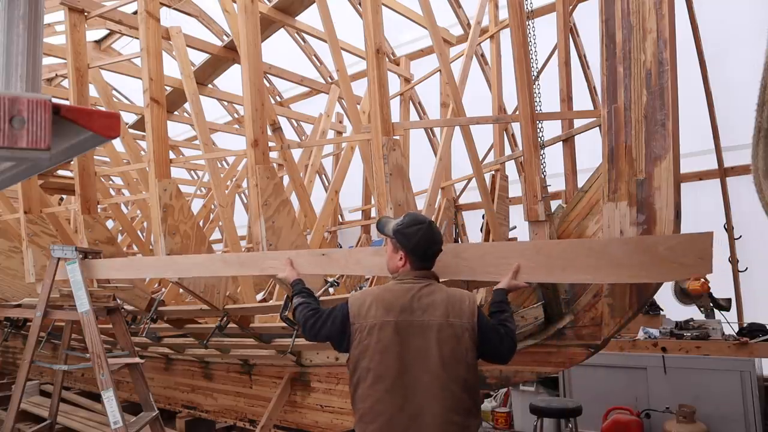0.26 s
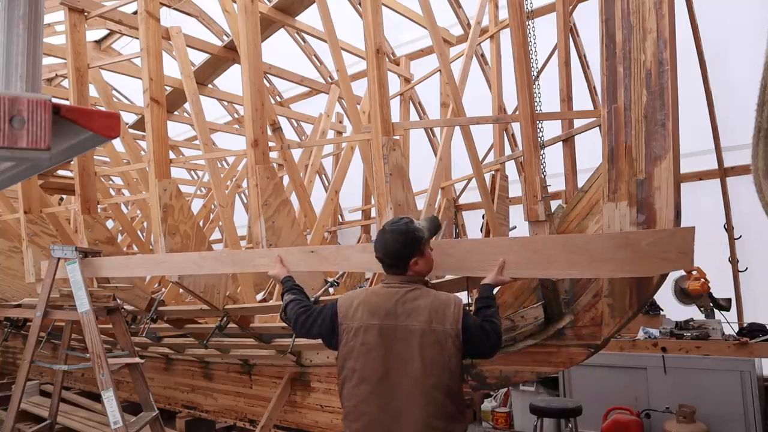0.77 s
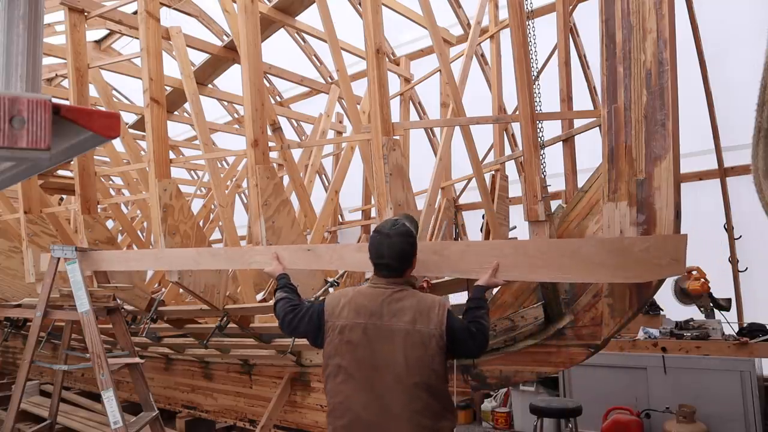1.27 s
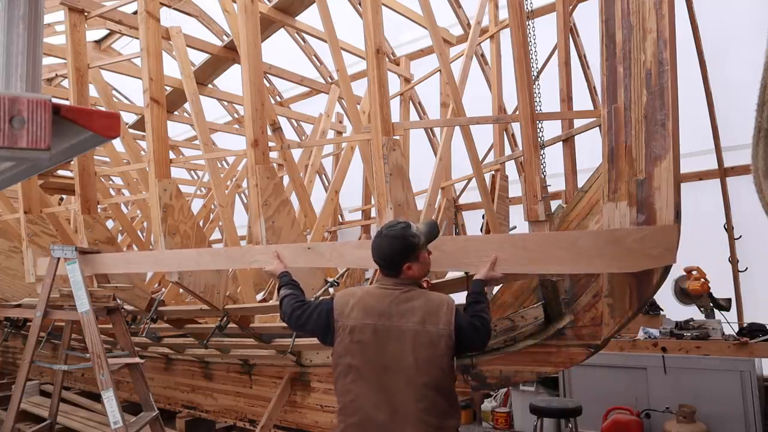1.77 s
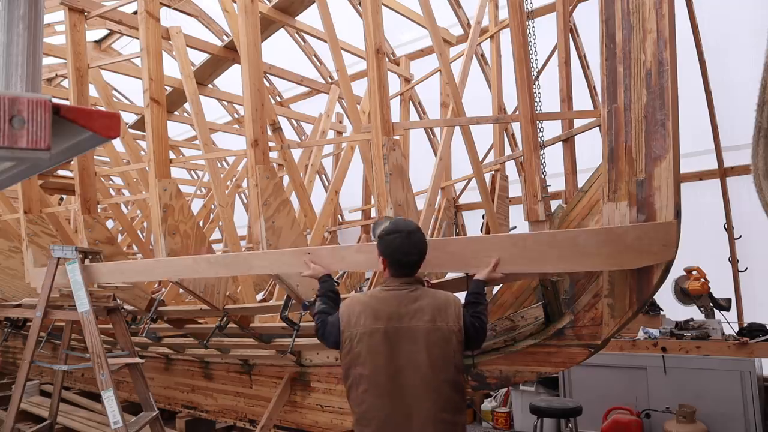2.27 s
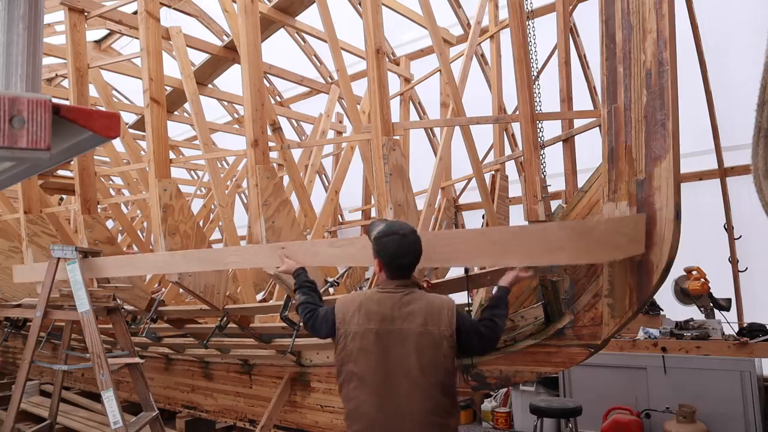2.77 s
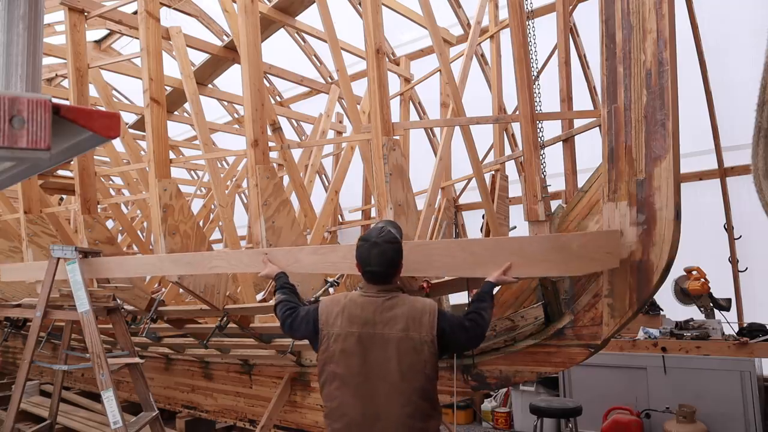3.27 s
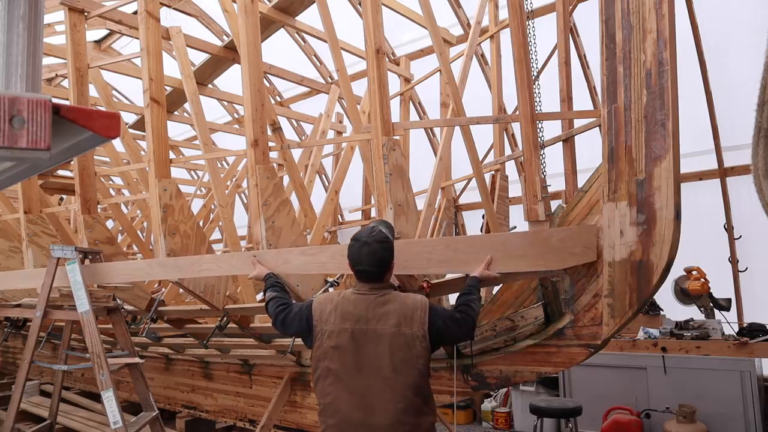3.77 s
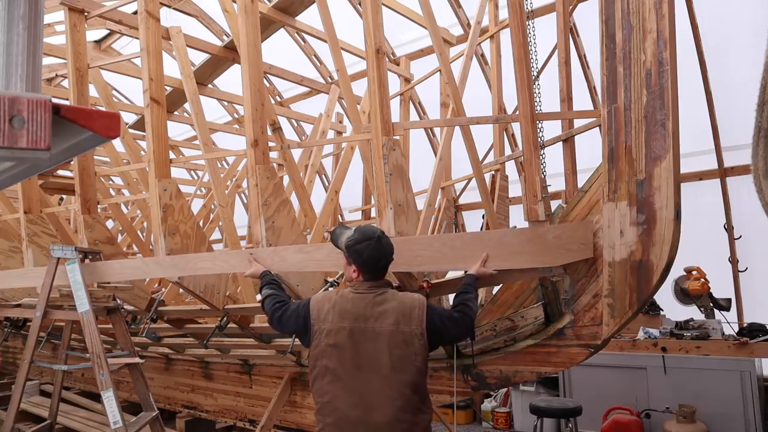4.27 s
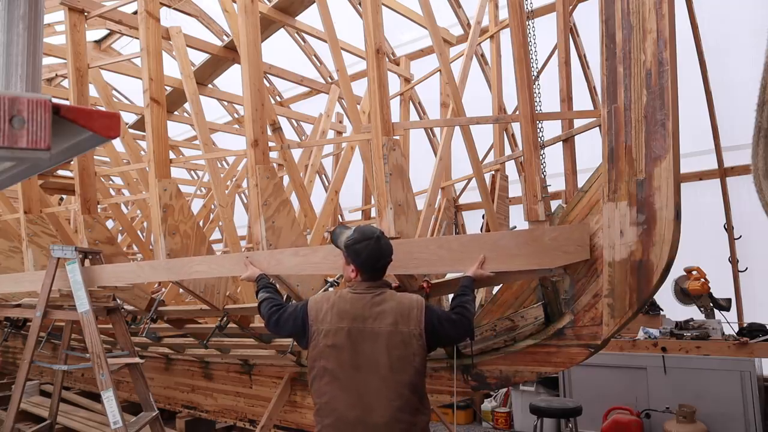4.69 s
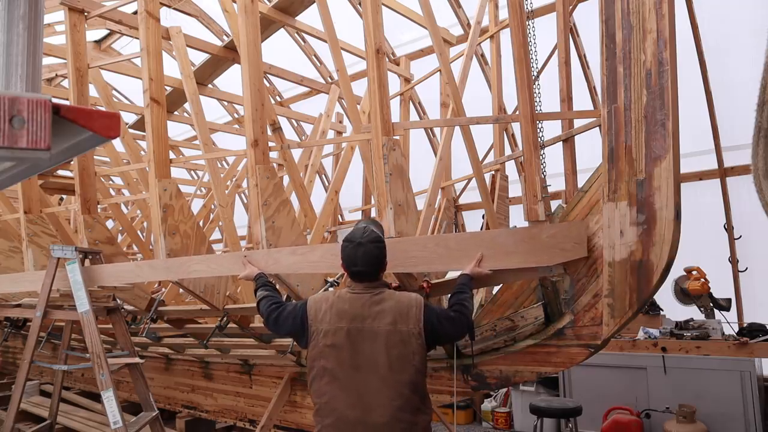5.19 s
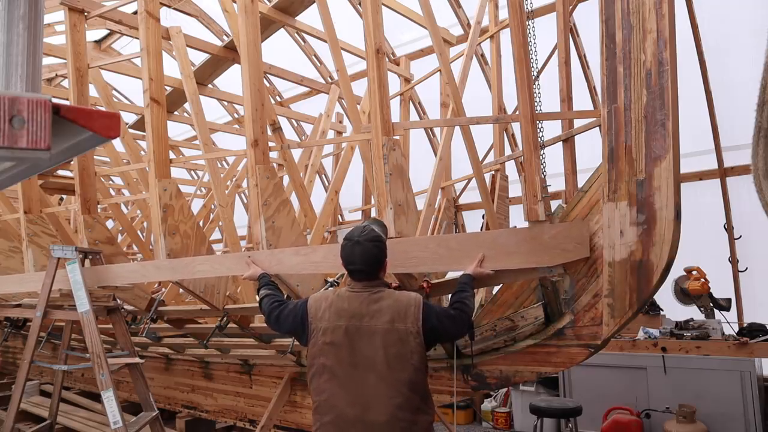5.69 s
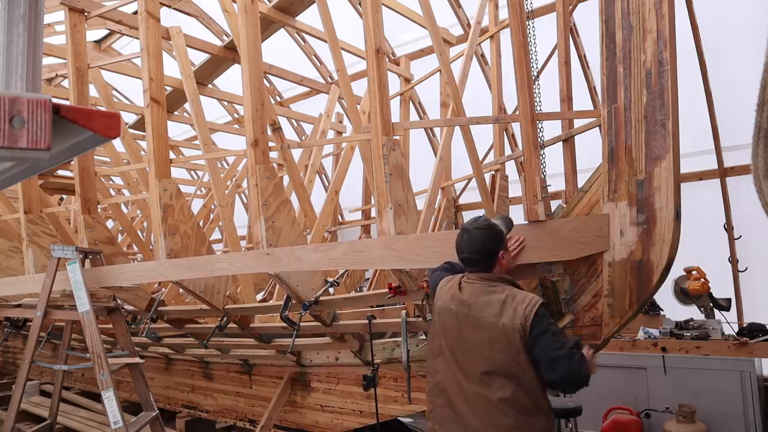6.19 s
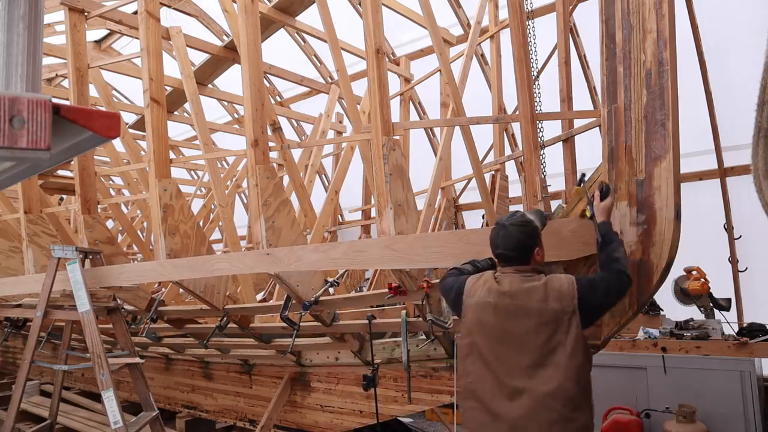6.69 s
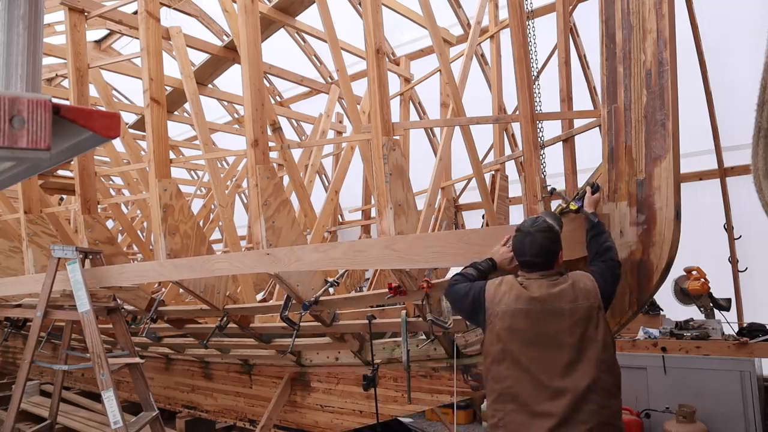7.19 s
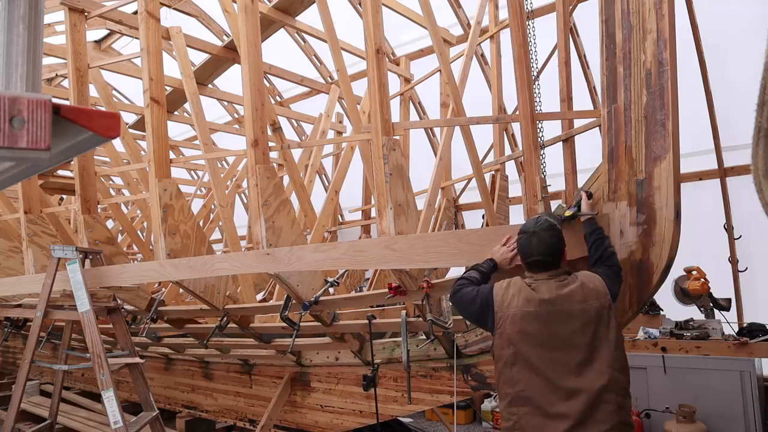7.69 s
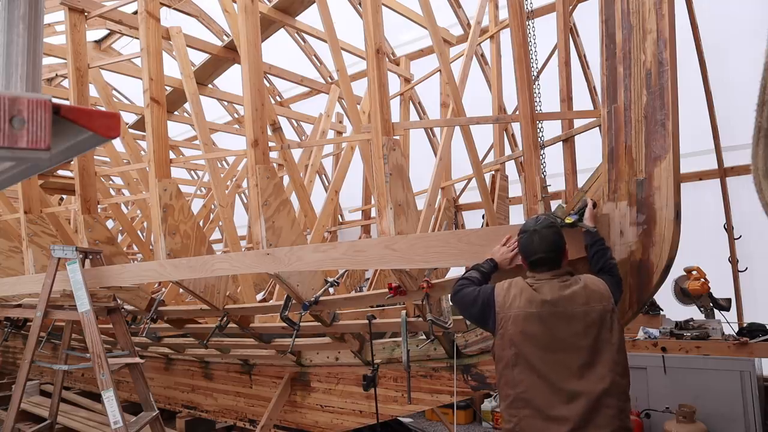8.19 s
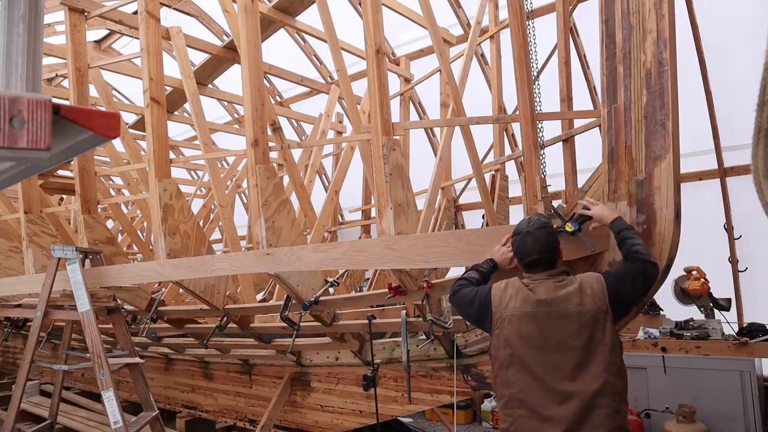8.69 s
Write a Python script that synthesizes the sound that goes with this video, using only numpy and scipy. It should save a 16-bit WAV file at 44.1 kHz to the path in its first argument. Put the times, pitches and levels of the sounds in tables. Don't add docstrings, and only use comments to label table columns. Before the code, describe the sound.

Close to the microphone in a large film-covered shed, a heavy plank slides along wooden frames with gritty scuffs and clusters of hollow knocks, one very loud near four seconds. Jolted steel clinks lightly. An abrupt cut chops off a knock; then a faint screw squeak, metal rattles and hard clamp blows on wood follow. A distant heater roars low throughout, and sparse short echoes answer.

```python
import sys
import numpy as np
from scipy import signal
from scipy.fft import rfft, irfft
from scipy.io import wavfile
from scipy.ndimage import uniform_filter1d

SR = 44100
rng = np.random.default_rng(int(sys.argv[2]) if len(sys.argv) > 2 else 0)


def attenuation_scalar(level_db):
    decades = np.asarray(level_db, float) / 20
    return 10 ** decades


def digitize_waveform(pressure):
    field = np.atleast_2d(pressure).T
    bounded = np.clip(field, -1, 1)
    quanta = np.round(bounded * 32767).astype(np.int16)
    wavfile.write(sys.argv[1], SR, quanta)


N = 394254
CUT_S = 6.017


def evened(x):
    return x / np.sqrt(np.mean(x ** 2) + 1e-20)


def peaked(x):
    return x / np.sqrt(uniform_filter1d(x ** 2, size=176).max() + 1e-20)


def read(points, hz):
    f, value = np.transpose(points)
    return np.interp(np.log(hz + 1), np.log(f + 1), value)


def coloured(x, points):
    hz = np.fft.rfftfreq(len(x), 1 / SR)
    return irfft(rfft(x) * attenuation_scalar(read(points, hz)), len(x))


def add(mix, s, sound):
    part = mix[round(s * SR):][:len(sound)]
    part += sound[:len(part)]


def modes(hz, t60, t):
    hz, t60 = np.asarray(hz)[:, None], np.clip(t60, .004, 1)[:, None]
    return attenuation_scalar(-60 * t / t60) * np.sin(2 * np.pi * hz * t)


# pitch_hz, level_db [dB per Hz]
HEATER_ROAR = [(20, -32), (46, -1), (74, -.5), (177, -11.5), (290, -9.5), (650, -20.5), (1200, -43),
               (4000, -68)]
# pitch_hz, level_db [dB per Hz]
MIC_HISS = [(1000, -43), (4000, -51), (16000, -58)]


def rumble():
    frames, hz = N // 512 + 5, np.fft.rfftfreq(2048, 1 / SR)
    a, b, patches = rng.standard_normal((frames, len(hz), 3)).T
    patches = uniform_filter1d(patches, size=10, axis=0)
    patches = evened(uniform_filter1d(patches, size=6, axis=1))
    colour = np.hypot(attenuation_scalar(read(HEATER_ROAR, hz)), attenuation_scalar(read(MIC_HISS, hz)))
    z = (a + 1j * b) * colour[:, None] * attenuation_scalar(1.42 * patches)
    roar = evened(signal.istft(z, nperseg=2048, noverlap=1536)[1][:N])
    level_db = np.where(np.arange(N) / SR < CUT_S, -35.5, -38)
    return roar * attenuation_scalar(level_db)


# start_s, length_s, pressure_db, brightness_db (above 6 kHz)
SKID_STROKES = [(0, 0.06, -35, 2.5), (0.052, 0.21, -43.5, 6), (0.425, 0.042, -55, -5),
                (1.569, 0.15, -31, -7.5), (2.333, 0.13, -38, -1.5), (2.837, 0.26, -30.5, -8.5),
                (3.161, 0.11, -28, -14), (4.84, 0.38, -48, -30), (6.936, 0.074, -31.5, -4.5),
                (8.16, 0.16, -51, -24), (8.412, 0.18, -48.5, -2)]
# start_s, length_s, first_pressure_db, last_pressure_db, brightness_db
HAND_PUSHES = [(0.253, 0.17, -60, -63, -25), (1.162, 0.089, -61, -49, -3.5), (1.284, 0.11, -51, -49.5, -4),
               (1.78, 0.43, -60.5, -60.5, -3), (3.32, 0.12, -62, -56, -8), (2.235, 0.061, -32.5, -31.5, -5),
               (2.43, 0.12, -62, -54, -5), (2.575, 0.1, -57, -43, -6), (2.712, 0.062, -56, -43.5, -4),
               (4.63, 0.081, -60, -50.5, -24), (4.565, .07, -60, -67, -24),
               (5.234, 0.23, -55.5, -54.5, -33), (5.54, 0.11, -46, -53, -30),
               (5.703, 0.33, -53, -47.5, -12), (6.017, 0.21, -56.5, -46.5, -11.5),
               (6.28, 0.28, -45, -45, -5), (6.602, 0.15, -44.5, -51, 3.5), (7.117, 0.3, -48.5, -51, -10.5),
               (7.401, 0.11, -52.5, -48.5, -2), (7.77, 0.053, -48, -45, -15),
               (8.02, 0.26, -49.5, -56, -4.5), (8.5, 0.082, -67, -53.5, -4), (8.688, 0.24, -53, -47.5, -7)]
SKID_FADE_DB = -19.5
TOUCH_S, LIFT_S = 0.029, 0.07


def rubbing():
    pressure, bright = np.zeros(N), np.zeros(N)
    strokes = [(s, length, db, db + SKID_FADE_DB, rel_db) for s, length, db, rel_db in SKID_STROKES]
    strokes += HAND_PUSHES
    for s, length, first_db, last_db, rel_db in strokes:
        start = max(s - TOUCH_S, 0)
        t = np.arange(start - s, length + LIFT_S, 1 / SR)
        contact = np.interp(t, [-TOUCH_S, 0, length, length + LIFT_S], [0, 1, 1, 0])
        stroke = contact * attenuation_scalar(np.interp(t, [0, length], [first_db, last_db]))
        add(pressure, start, stroke)
        add(bright, start, stroke * attenuation_scalar(rel_db))
    return pressure, bright


def patchy(x, patchy_db):
    _, _, z = signal.stft(x, SR, nperseg=512)
    patches = uniform_filter1d(rng.standard_normal(z.shape), size=5, axis=0)
    patches = evened(uniform_filter1d(patches, size=8, axis=1))
    return evened(signal.istft(z * attenuation_scalar(patchy_db * patches), SR, nperseg=512)[1][:N])


# pitch_hz, level_db
RUB_BODY = [(300, -41), (700, 11.5), (1300, 11), (2500, 5.5), (4300, 2), (6000, -11), (9000, -19)]
# pitch_hz, level_db
WOOD_DUST = [(2000, -11), (5000, 6.5), (8000, 3), (11000, -1.5), (13500, -2.5), (16000, -10)]


def scuffs():
    pressure, bright = rubbing()
    catches = rng.random((2, N)) < 1500 / SR
    jerks = attenuation_scalar(1.1 * np.minimum(rng.exponential(1, (2, N)), 4))
    slips = rng.standard_normal((2, N)) * (0.76 + catches * jerks)
    body = patchy(coloured(slips[0], RUB_BODY), patchy_db=2.5)
    dust = patchy(coloured(slips[1], WOOD_DUST), patchy_db=2.0)
    return body * pressure * attenuation_scalar(-3.5) + dust * bright * attenuation_scalar(-7.5)


# start_s, level_db, pitch_hz
STEEL_TICKS = [(.029, -45, 10000), (.042, -40, 13000), (.048, -43, 7500), (.051, -34, 7000),
               (.057, -43, 7500), (.067, -40, 7500), (0.109, -41, 8550), (.113, -47, 7500),
               (.116, -41, 12500), (.184, -49, 12000), (.189, -50, 10500), (.2, -59, 8000),
               (1.217, -59, 8500), (1.265, -52, 11500), (1.292, -54, 12000), (1.352, -56, 9500),
               (1.372, -55, 5000), (6.588, -52, 8000), (6.018, -44.5, 8050), (6.616, -35.5, 7100),
               (6.63, -49, 9000), (6.671, -36, 8800), (6.69, -54, 7500), (6.703, -43, 11000),
               (6.737, -44, 10900), (6.752, -46, 12000), (8.116, -58, 5950), (8.145, -52, 7000),
               (8.24, -56, 7000), (8.875, -45, 3940), (8.896, -42, 3450)]


def ticks():
    out, t = np.zeros(N), np.arange(6000) / SR
    for s, db, hz in STEEL_TICKS:
        ratio = rng.uniform(.55, 1.4, 14)
        mode_hz = np.minimum(hz * ratio, 15000 / np.sqrt(ratio))
        steel = modes(mode_hz, np.full(14, .003), t).sum(0)
        add(out, s, attenuation_scalar(db) * peaked(steel * (1 - np.exp(-t / .0002))))
    return out


# start_s, blow_db, pitch_hz, hardness_db
CLEAN_TAPS = [(.927, -43.5, 1100, -20), (1.387, -25, 600, -25), (1.548, -22.5, 1000, -20),
              (1.575, -24.5, 950, -20), (1.628, -27.5, 192, -35), (1.654, -29, 700, -27),
              (2.176, -24, 1100, -20), (2.183, -25, 1200, -20), (2.1905, -12.5, 804, -29),
              (2.1945, -17, 1300, -20), (2.199, -13, 900, -25), (2.204, -18, 900, -25),
              (2.219, -24, 900, -20), (2.225, -21, 990, -22), (3.607, -16.5, 775, -13),
              (3.612, -19.5, 700, -12), (3.652, -21, 760, -15), (3.656, -15, 1690, -12.5),
              (3.66, -16.5, 910, -23), (3.8133, -2.5, 750, -24), (3.8187, -12, 800, -27),
              (3.8262, -8, 765, -31), (3.8325, -8, 744, -33), (3.8373, -13, 1000, -23),
              (3.846, -17, 1100, -27), (7.5313, -15, 900, -24), (7.537, -18, 600, -30),
              (7.549, -15, 570, -30), (7.557, -22, 597, -30), (7.571, -18.5, 596, -28),
              (7.641, -19, 535, -9), (7.68, -14, 301, -8), (7.691, -19, 300, -25), (7.719, -24, 201, -35),
              (7.8502, -4.5, 574, -15), (7.859, -19, 576, -10), (7.865, -13, 480, -20),
              (8.284, -21, 644, -17), (8.297, -19, 298, -25), (8.326, -20.5, 297, -23),
              (8.346, -21.5, 231, -23), (8.359, -18, 380, -10), (8.599, -29, 560, -17)]
# start_s, blow_db, pitch_hz, hardness_db
ROLLING_TAPS = [(1.404, -27, 1700, -20), (1.392, -33, 600, -25), (2.812, -21, 724, -18),
                (2.833, -22.5, 1500, -20), (2.8387, -18.5, 997, -18), (2.844, -21, 790, -25),
                (2.851, -24.5, 380, -22), (3.136, -22, 1010, -20), (3.146, -24.5, 650, -25),
                (3.822, -9, 1310, -30), (3.83, -11, 750, -23), (3.842, -19, 1700, -30),
                (3.8493, -21, 1000, -28), (4.544, -29.5, 796, -24), (4.557, -36, 890, -28),
                (4.747, -25, 1500, -13), (4.755, -26, 900, -20), (4.773, -23, 720, -18),
                (4.78, -18.5, 760, -25), (4.786, -25, 780, -27), (4.81, -29, 1300, -15),
                (5.631, -41.5, 2000, -11), (5.648, -27, 298, -30), (5.943, -33, 350, -24),
                (5.967, -38, 1500, -18), (5.972, -40, 400, -25), (6.78, -25, 600, -11),
                (6.803, -29, 596, -8), (6.807, -23, 3020, -15), (6.907, -29, 347, -15),
                (7.012, -27.5, 400, -10), (7.016, -24, 2980, -12), (7.086, -28, 700, -5),
                (7.105, -34.5, 900, -12), (7.856, -11.5, 2300, -15), (7.861, -14.5, 2670, -15),
                (7.8595, -8.5, 600, -25), (7.872, -15, 1500, -22), (7.878, -15, 1400, -22),
                (7.735, -28, 301, -30), (8.35, -22, 504, -15), (8.405, -32, 300, -30),
                (8.29, -26, 2980, -12), (8.63, -28.5, 300, -25), (6.932, -30, 990, -12),
                (6.815, -28, 2800, -12), (7.66, -28, 2580, -12), (5.996, -26.5, 2450, -20),
                (6.008, -28, 2450, -20)]
TAP_DUST_DB = -70


def clean_contacts(t):
    for rows, rolling in [(CLEAN_TAPS, False), (ROLLING_TAPS, True)]:
        for s, db, hz, hard_db in rows:
            note = attenuation_scalar(16) * np.sin(2 * np.pi * hz * t)
            hold = np.exp(-t * hz / 3.43)
            if rolling:
                hold = hold * (1 - np.exp(-(t * hz / 0.78) ** 2))
            yield (s, db, hz, hard_db, TAP_DUST_DB - db, 0), note, hold


def chattered(rows):
    gaps = np.diff([-1] + [row[0] for row in rows])
    return [(*row, 0.021 if gap > .07 else 0.014) for row, gap in zip(rows, gaps)]


# start_s, blow_db, pitch_hz, hardness_db (2-6 kHz), grit_db (above 7 kHz)
FRAME_BUMPS = [(1.377, -30, 800, -1.5, -13), (1.403, -27, 1210, -9, -24), (1.438, -35, 1200, -5, -26),
               (1.54, -25, 1100, -28, -9.5), (1.573, -26.5, 700, -19, -11), (1.654, -36.5, 780, -21, -28),
               (2.151, -17.5, 1090, -14, -25), (2.164, -21, 1000, -26, -40), (2.191, -17.5, 900, -37, -37),
               (2.221, -35, 781, -1, -35), (2.81, -21, 800, -17, -10), (2.837, -19.5, 1100, -17, -10.5),
               (2.849, -29, 791, -7, -12), (3.131, -23, 620, -11, -21), (3.189, -33.5, 654, -1, -14)]
# start_s, blow_db, pitch_hz, chatter_s
BATTEN_RAPS = [(1.3781, -27.5, 1200, 0.015), (2.192, -16.5, 1310, 0.0075), (2.81, -26, 1460, 0.016),
               (3.1321, -21.5, 1030, 0.0064), (3.6096, -26, 1320, 0.013), (3.6561, -20.5, 1700, 0.014),
               (4.545, -38, 864, 0.015), (6.0118, -23, 1350, .02), (7.087, -34, 750, 0.006),
               (7.538, -28, 1200, 0.018), (7.851, -7, 1600, 0.02)]
# start_s, blow_db, pitch_hz, hardness_db, chatter_s
FRAME_THUMPS = [(1.599, -29, 197, -33, 0.05), (2.843, -25, 253, -29, 0.014), (4.545, -30, 258, -44, 0.012),
                (5.63, -29.5, 187, -26.5, 0.026), (5.939, -28, 259, -37, 0.02),
                (7.086, -28.5, 260, -12, 0.014), (7.689, -25.5, 219, -13, .02),
                (7.836, -28, 433, -8, 0.011), (7.869, -17, 403, -34, 0.028), (7.958, -37, 303, -18, 0.01),
                (8.298, -27, 189, -18, .025), (7.534, -27, 420, -28, 0.012)]
# start_s, blow_db, pitch_hz, hardness_db, chatter_s
PLANK_SEATS = [(3.6036, -25.5, 1180, -12, 0.024), (3.65, -26, 890, -9.5, 0.026),
               (3.8134, -2.5, 880, -27, 0.024), (3.877, -17, 1130, -29, 0.013),
               (4.739, -29, 700, -14, 0.02), (4.772, -22.5, 755, -16, 0.013), (4.783, -27, 1300, -5, 0.019),
               (5.349, -44, 1160, -30, 0.029), (5.527, -55, 541, -9, .015), (5.63, -39, 594, -31, 0.022),
               (5.732, -39, 713, -0.5, 0.015), (5.808, -38.5, 760, -27, 0.029),
               (5.98, -20.5, 870, -15, 0.017), (6, -21.5, 815, -24, 0.039)]
# start_s, blow_db, pitch_hz, hardness_db, grit_db
JAW_BLOWS = [(6.78, -29, 557, 5.5, -8.5), (6.803, -31, 1300, 10, -12), (6.907, -31.5, 760, -1, -6),
             (7.012, -28, 1460, 5.5, -12.5), (7.438, -37.5, 886, -28, -29), (7.531, -19.5, 560, -16, -25.5),
             (7.636, -24, 700, 1.5, -18), (7.674, -19.5, 600, -6, -29), (7.85, -11.5, 540, -0.5, -20),
             (8.155, -53, 620, 11.5, -19), (8.284, -24, 570, 1, -13), (8.355, -23, 885, -6, -42.5),
             (8.598, -28, 575, -9.5, -40), (8.617, -27.5, 398, 0, -21)]
SEAT_DUST_DB = -64.5


def wood_blows():
    raps = [(s, db, hz, -23, -42.5, chatter) for s, db, hz, chatter in BATTEN_RAPS]
    thumps = [(s, db, hz, hard, -41.5, chatter) for s, db, hz, hard, chatter in FRAME_THUMPS]
    seats = [(s, db, hz, hard, SEAT_DUST_DB - db, chatter) for s, db, hz, hard, chatter in PLANK_SEATS]
    return chattered(FRAME_BUMPS) + raps + thumps + seats + chattered(JAW_BLOWS)


def struck(contacts, body, soft_s):
    push = signal.windows.hann(max(round(soft_s * SR), 3))
    return peaked(signal.fftconvolve(np.convolve(contacts, push), body)[:len(contacts)])


def chatter_contacts(db, grit_db, chatter_s, noise, fade, t):
    contacts = np.zeros(len(t))
    if chatter_s > 0:
        contacts = .3 * np.clip(noise, -1.5, 1.5) * (rng.random(len(t)) < 1500 / SR) * fade
    sharp = np.interp(grit_db, [-48, -30], [0, 1])
    contacts *= 1 - (1 - sharp) * np.exp(-t / 0.0095)
    contacts[0] = np.clip(attenuation_scalar(1.6 * db + 15.5), 0.035 + 0.22 * sharp, 1)
    return contacts


# pitch_hz, level_db, t60_s
PLANK_MODES = [(297.5, 0, 0.16), (383, -9.5, 0.2), (503, 9, 0.0061), (586.8, -0.5, 0.14),
               (700, -6.5, 0.072), (763, 5.5, 0.038), (950, -2.5, 0.024), (1114, -3, 0.04),
               (1294, 7.5, 0.026), (1473, 0, 0.033), (1600, 5.5, 0.031)]
# pitch_hz, level_db
CRACK_COLOUR = [(1000, -8.5), (1500, -5), (2200, -3.5), (3200, -2), (4500, -2), (6000, -14.5), (8000, -14)]
# pitch_hz, t60_s
FRAME_DECAY = [(200, 0.046), (800, 0.036), (2000, 0.038), (7000, 0.015)]


def knocks():
    out, t = np.zeros(N), np.arange(6144) / SR
    crowd_hz = np.geomspace(150, 8500, 260) * rng.uniform(.995, 1.005, 260)
    crowd = modes(crowd_hz, read(FRAME_DECAY, crowd_hz), t)
    plank_hz, plank_db, plank_t60 = np.transpose(PLANK_MODES)
    plank = modes(plank_hz, plank_t60, t)
    blows = [(row, 0, 1) for row in wood_blows()]
    for (s, db, hz, hard_db, grit_db, chatter_s), note, hold in blows + list(clean_contacts(t)):
        noise = rng.standard_normal(len(t))
        side = rng.choice([-1., 1.], (2, len(crowd_hz)))
        fade = np.exp(-t / np.clip(chatter_s, .002, .05))
        contacts = chatter_contacts(db, grit_db, chatter_s, noise, fade, t)
        clear = attenuation_scalar(plank_db - 11.0 * np.log2(plank_hz / hz) ** 2) @ plank
        octaves = np.log2(crowd_hz / hz)
        drive_db = -9.5 - np.where(octaves < 0, 14., 5.) * octaves ** 2
        crowded = (side[0] * attenuation_scalar(drive_db)) @ crowd
        body = struck(contacts, (clear + crowded + note) * hold, soft_s=0.00032)
        stiff = (side[1] * attenuation_scalar(read(CRACK_COLOUR, crowd_hz))) @ crowd
        crack = struck(contacts, stiff, soft_s=.00012)
        puffs = signal.lfilter([1], [1, -np.exp(-1 / (0.0048 * SR))], abs(contacts)) + 0.27 * fade
        grit = peaked(coloured(noise[::-1] * puffs, WOOD_DUST))
        add(out, s, attenuation_scalar(db) * (body + attenuation_scalar(hard_db) * crack + attenuation_scalar(grit_db) * grit))
    return signal.lfilter(*signal.butter(2, 155, "high", fs=SR), out)


# start_s, level_db, size (factor on its modes)
CLAMP_JOLTS = [
    (1.379, -28, 1.05),
    (2.152, -26.5, 0.97),
    (2.19, -36, 1.0),
    (3.132, -26.5, 1.024),
    (3.189, -36.5, .97),
    (7.642, -29.5, 1.2),
]
# pitch_hz, spread_hz, level_db, t60_s
CLAMP_MODES = [(5320, 590, 4.5, 0.088), (10500, 520, -10.5, 0.058), (8200, 300, -40, .04)]


def clinks():
    out, t, place = np.zeros(N), np.arange(6000) / SR, np.linspace(-1.6, 1.6, 24)
    for s, db, size in CLAMP_JOLTS:
        steel = np.zeros(len(t))
        for hz, spread_hz, crowd_db, t60 in CLAMP_MODES:
            shift, luck = rng.uniform(-1, 1, (2, len(place)))
            mode_hz = size * hz + spread_hz * (place + 0.078 * shift)
            level = np.sign(luck) * attenuation_scalar(crowd_db - 3.4 * place ** 2)
            steel += level @ modes(mode_hz, t60 * (1 + 0.52 * luck), t)
        add(out, s, attenuation_scalar(db) * peaked(steel * (1 - np.exp(-t / 0.00024))))
    return out


# start_s, level_db, pitch_hz, t60_s
STEEL_RINGS = [(5.355, -42, 1256, 0.13), (5.732, -42, 4050, 0.051), (5.807, -36, 2430, 0.039),
               (5.81, -32, 2110, 0.032), (5.979, -10.5, 2466, 0.025), (5.981, -35, 1760, 0.08),
               (6.225, -39, 2320, 0.076), (6.16, -48, 1540, .2), (6.195, -46, 2100, .05),
               (6.225, -38, 1640, 0.055), (6.24, -38, 1720, .06), (6.26, -42, 1900, .05),
               (6.31, -43, 1810, .07), (6.49, -35, 1530, .05), (6.284, -31, 1535, 0.1),
               (6.305, -38, 1560, .07), (6.325, -31.5, 1500, 0.1), (6.37, -40, 1520, .08),
               (6.351, -39, 1720, 0.082), (6.485, -33, 1745, 0.044), (6.525, -34.5, 1225, 0.08),
               (6.41, -47, 1240, .1), (6.55, -42, 2200, .05), (7.83, -38, 2500, .04),
               (8.604, -24, 1560, .04), (8.613, -14.5, 1595, 0.037), (8.681, -31, 1266, 0.089)]


def rings():
    out, t = np.zeros(N), np.arange(6000) / SR
    for s, db, hz, t60 in STEEL_RINGS:
        add(out, s, attenuation_scalar(db) * modes([hz], [t60], t)[0] * (1 - np.exp(-t / .004)))
    return out


# start_s, pitch_hz, level_db
SCREW_SQUEAK = [
    (6.025, 1190, -51),
    (6.12, 1190, -48),
    (6.2, 1186, -51),
    (6.24, 1225, -55),
    (6.34, 1230, -58),
]


def squeak():
    out = np.zeros(N)
    s, hz, db = np.transpose(SCREW_SQUEAK)
    t = np.arange(s[0], s[-1], 1 / SR)
    waver = evened(uniform_filter1d(rng.standard_normal(len(t)), size=300))
    turn = 2 * np.pi * np.cumsum(np.interp(t, s, hz) * (1 + .002 * waver)) / SR
    tone = np.sin(turn) + attenuation_scalar(-13 + 2 * waver) * np.sin(2 * turn)
    add(out, s[0], attenuation_scalar(np.interp(t, s, db)) * tone * signal.windows.tukey(len(t), .1))
    return out


# pitch_hz, t60_s
SHED_DECAY = [(150, 0.98), (400, 0.12), (1040, 0.29), (2760, 0.35), (5000, 0.33), (9000, 0.33)]


def shed(x):
    echoes = np.zeros((3, SR // 2))
    at = np.arange(200, SR // 2 - 20, 20) + rng.integers(0, 20, (3, (SR // 2 - 201) // 20))
    np.put_along_axis(echoes, at, rng.choice([-1., 1.], at.shape), 1)
    hz, t, z = signal.stft(echoes, SR, nperseg=256)
    t60 = np.clip(read(SHED_DECAY, hz), .03, 2)[:, None]
    tails = signal.istft(z * attenuation_scalar(-60 * t / t60), SR, nperseg=256)[1]
    turn = 2 * np.pi * (37 * np.arange(N) / SR + np.arange(3)[:, None] / 3)
    feeds = x * np.cos(turn) * np.sqrt(2 / 3)
    return signal.fftconvolve(feeds, tails / np.linalg.norm(tails[0]), axes=1)[:, :N].sum(0)


def scene():
    wood, steel = knocks(), ticks() + clinks() + rings() + squeak()
    t = np.arange(N) / SR
    before = np.clip((CUT_S - t) / .003, 0, 1)
    after = t > CUT_S + .3
    early = (wood + steel) * before
    late = wood * after + steel * (1 - before)
    wet = attenuation_scalar(-7.5) * (shed(early) * before + shed(late))
    return (early + late + wet + scuffs() + rumble())[None]


def roll_off(x):
    return signal.sosfilt(signal.butter(12, 16560, fs=SR, output="sos"), x)


def record(dry):
    heard = signal.lfilter(*signal.butter(2, 32.6, "high", fs=SR), dry[0])
    treble_edge = signal.firwin(401, 15950, window=("kaiser", 7), fs=SR)
    heard = signal.oaconvolve(heard, treble_edge, "same")
    power = abs(uniform_filter1d(heard ** 2, size=300, origin=149))
    power_db = 10 * np.log10(power + 1e-12)
    fall = np.arange(N) * 60. / SR
    held_db = np.maximum.accumulate(power_db + fall) - fall
    over_db = np.maximum(held_db + 29.5, 0)
    lag = np.exp(-1 / (0.00024 * SR))
    ducked = heard / attenuation_scalar(0.18 * signal.lfilter([1 - lag], [1, -lag], over_db))
    return roll_off(np.clip(ducked, -1, 1)[None])


dry = scene()
out = record(dry)
digitize_waveform(out)
```